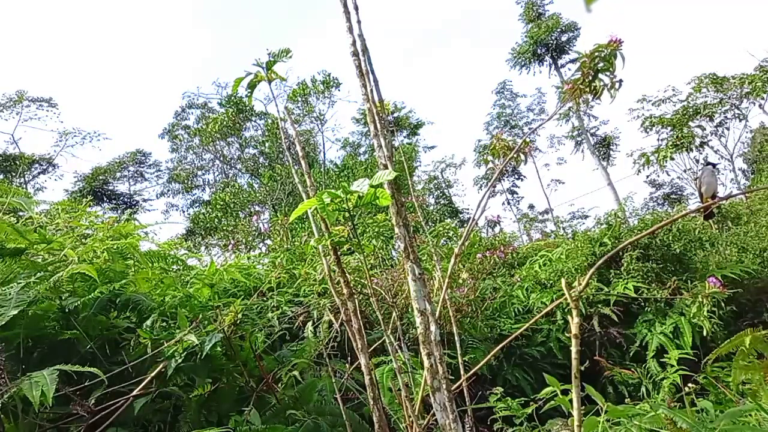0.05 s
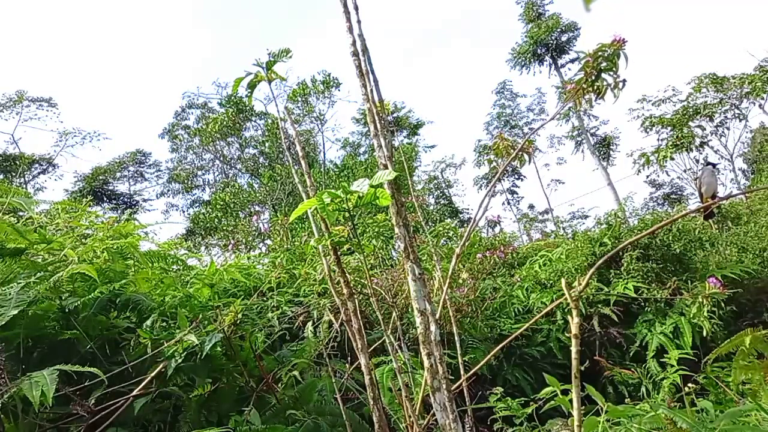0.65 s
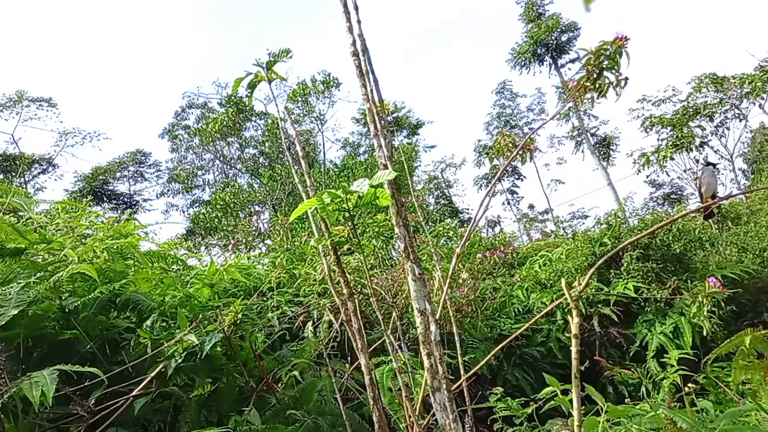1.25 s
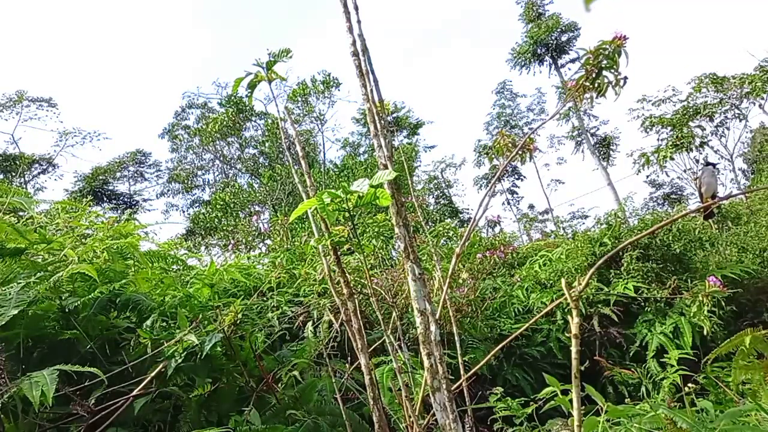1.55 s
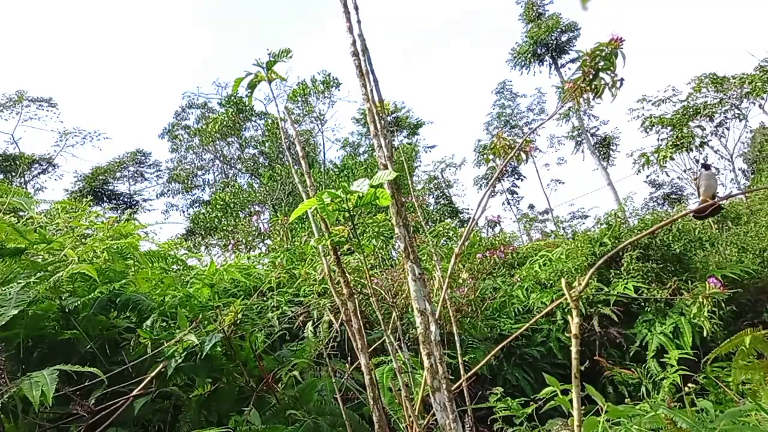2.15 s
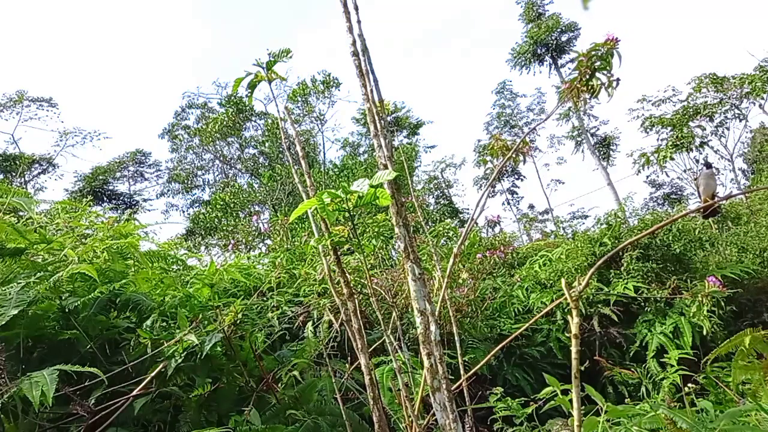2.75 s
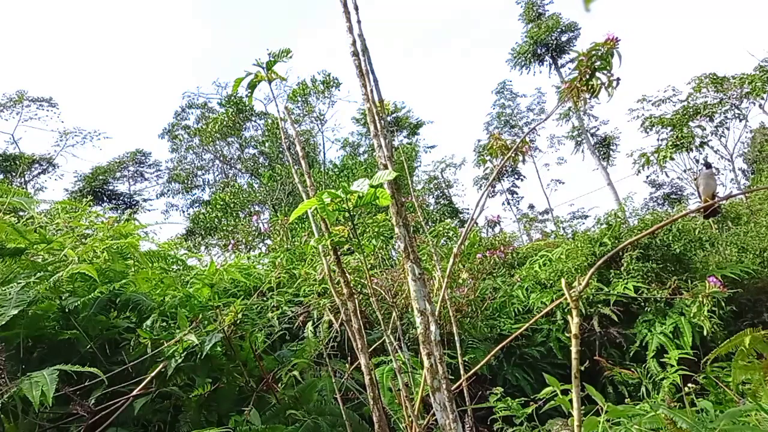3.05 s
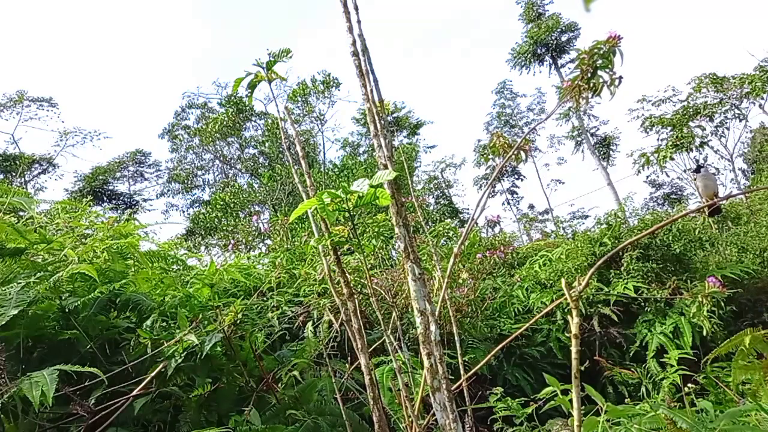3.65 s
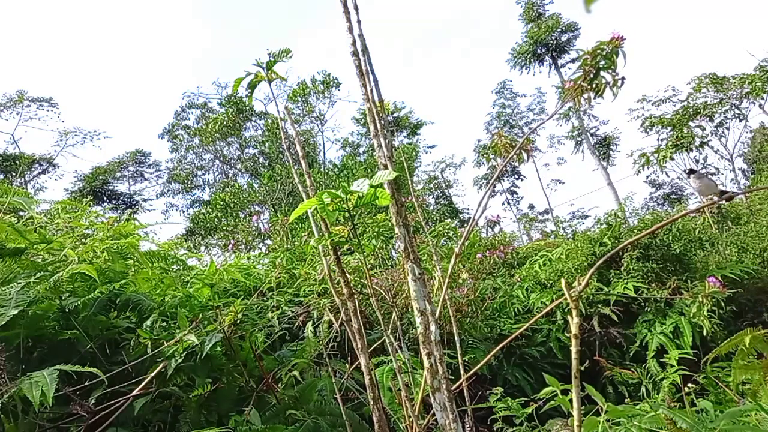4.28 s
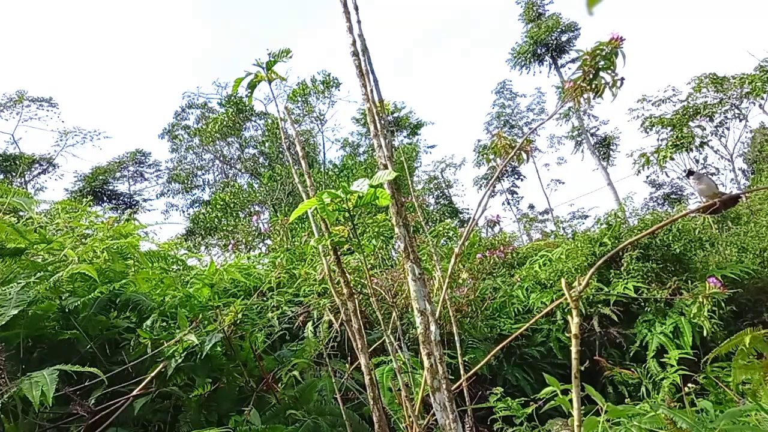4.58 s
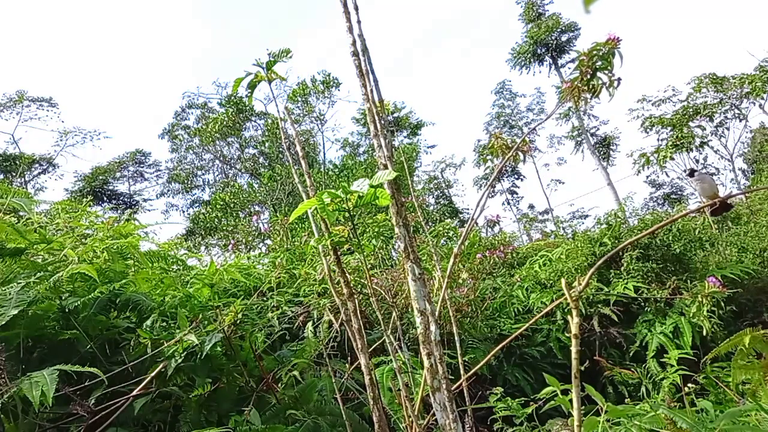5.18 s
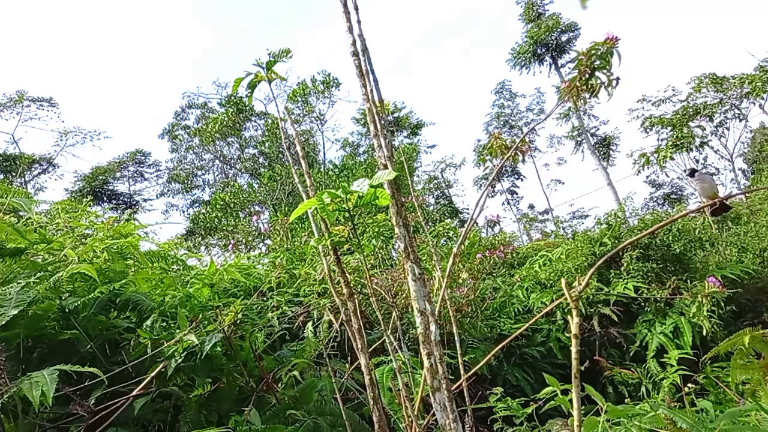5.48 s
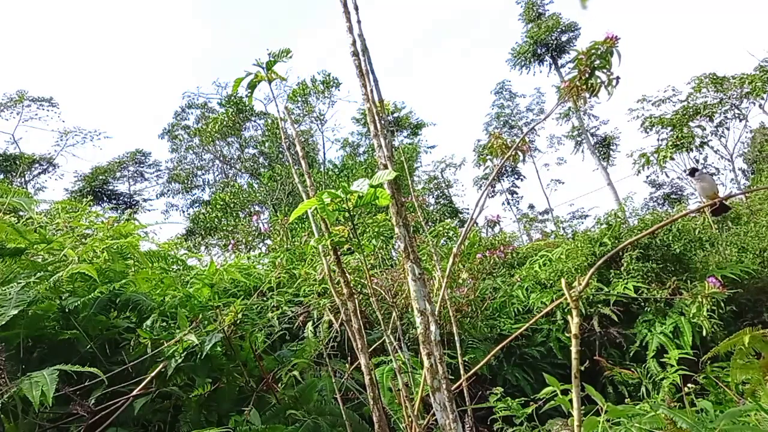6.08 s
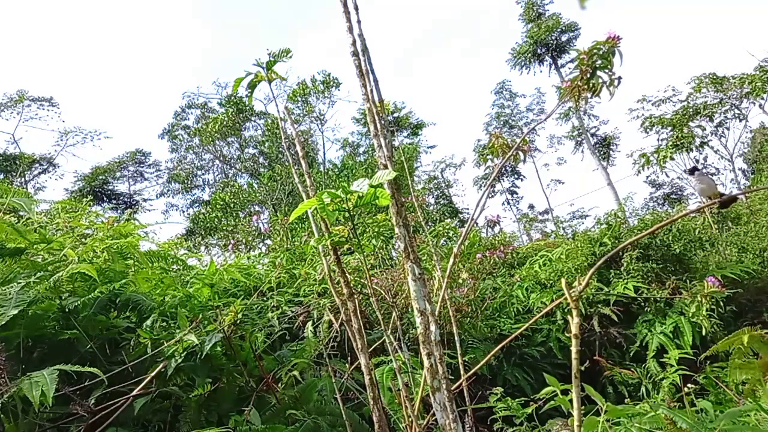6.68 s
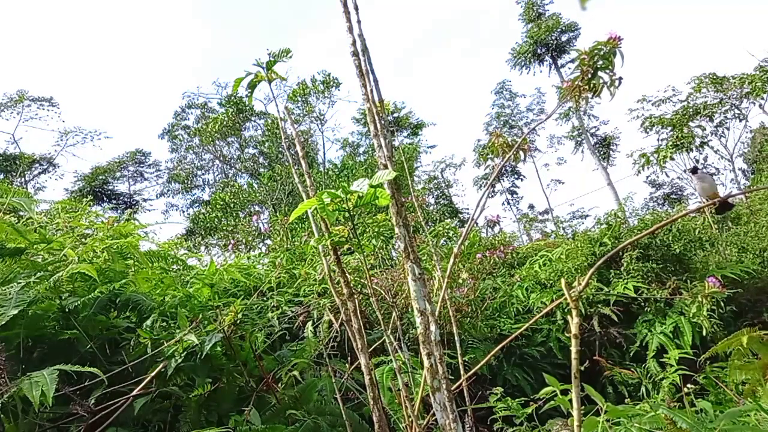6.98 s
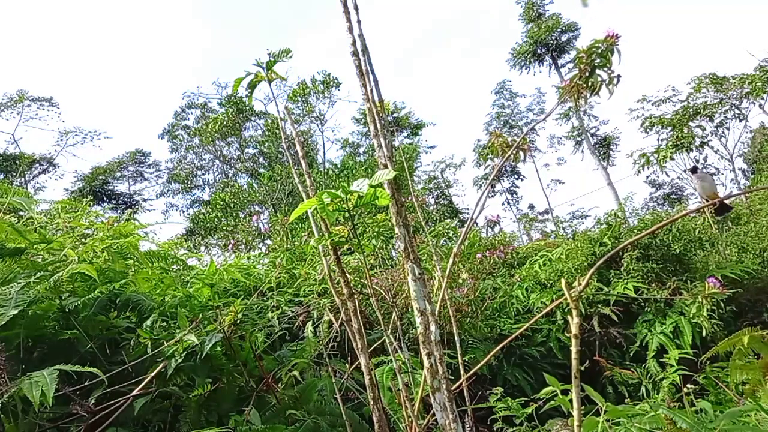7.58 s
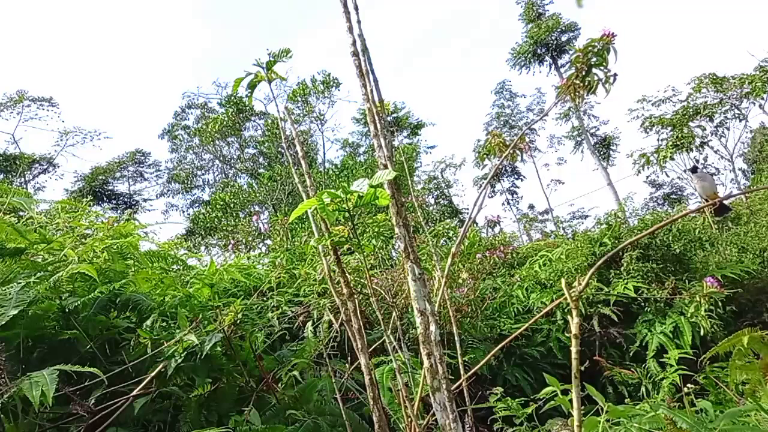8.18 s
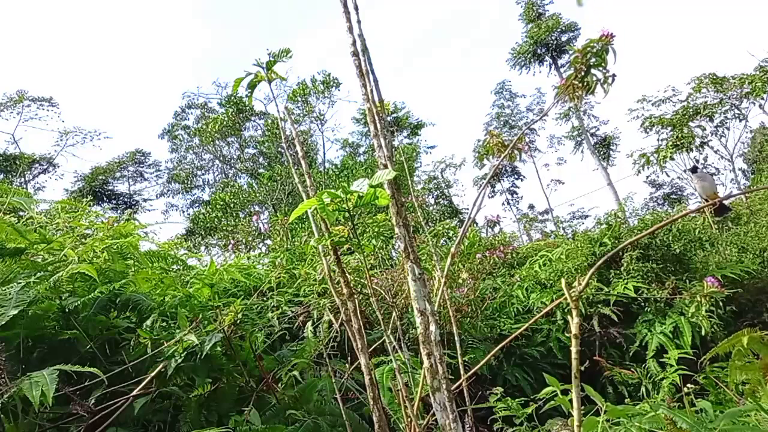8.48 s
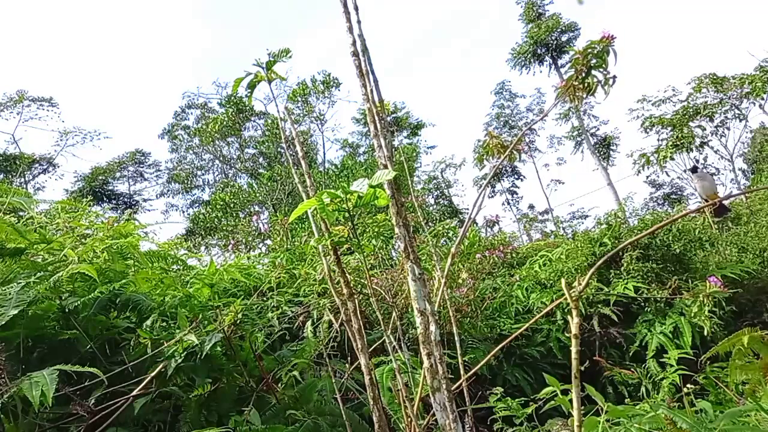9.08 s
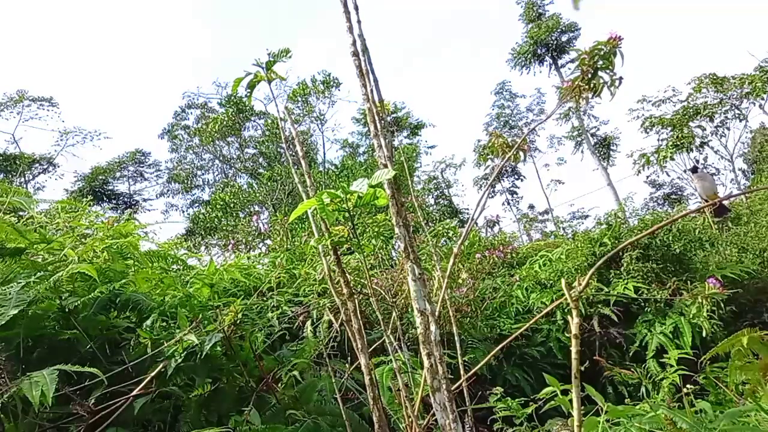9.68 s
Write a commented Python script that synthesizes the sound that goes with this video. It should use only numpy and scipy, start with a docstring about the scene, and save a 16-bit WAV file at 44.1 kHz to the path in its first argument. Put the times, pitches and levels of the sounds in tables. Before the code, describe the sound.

A quiet outdoor hillside runs for about ten seconds, with a faint low rumble, a thin hiss and several crickets chirping softly in high, pulsing bouts. At about 1.8 seconds a nearby bulbul gives a short, sharp call lasting roughly a third of a second: a rasping chip, a two-step note, then a loud whistled flourish. It repeats the call at 4.2 seconds, slightly duller, and again at 6.5 seconds. The loudest notes slightly overload the microphone, and the foliage adds a brief, light reverberation. Very faint peeps from distant birds are scattered throughout, the clearest near 7.5 seconds. A barely audible, high, throbbing bush cricket swells from about 1 to 4.5 seconds and again from 7.5 seconds. After the last call only the insects, far peeps and rumble remain.

```python
"""A green hillside. From the start the valley rumbles faintly and crickets chirp by stridulation.
Small birds begin to peep far off, and a bush cricket's throbbing wing resonance slowly swells.
Near 1.8, 4.2 and 6.5 s a nearby bulbul calls with both sides of its syrinx: a rasping chip, a two-step
note, then a loud whistled flourish. Leaves scatter the calls; the loudest notes overload the microphone.
Afterwards the bush cricket swells again, among the crickets and the last far peeps."""
import sys
import numpy as np
from scipy import signal
from scipy.fft import rfft, irfft, next_fast_len
from scipy.io import wavfile
from scipy.ndimage import uniform_filter1d, minimum_filter1d, map_coordinates

SR = 44100
rng = np.random.default_rng(int(sys.argv[2]) if len(sys.argv) > 2 else 0)


def inscribe(sig):
    """Save sig as 16-bit PCM at rate SR to the path in sys.argv[1].

    A 1-D sig is mono; a 2-D sig holds one channel per row.
    Samples are clipped to [-1, 1] before scaling.
    """
    pcm = np.round(np.clip(np.atleast_2d(sig).T, -1, 1) * 32767)
    wavfile.write(sys.argv[1], SR, pcm.astype(np.int16))


N = 433938

# spectra of the valley's rumble and thin hiss: (frequency [Hz], relative density [dB])
RUMBLE_SPECTRUM = [(12, -56.5), (20, -30), (54, -2), (103, 0.5), (200, -9.5), (236, -6), (278, -12.5),
                   (313, -12.5), (469, -19.5), (1030, -29), (3210, -36.5), (4060, -39), (4470, -37.5),
                   (5800, -45), (7540, -73), (12800, -120)]
VALLEY_HISS_SPECTRUM = [(4500, -31), (5800, -5), (6500, 1.5), (7400, 3), (8300, -4), (9500, -4.5),
                        (11500, -3.5), (13500, -3.5), (15500, -6)]
# reverberation among the trees: (frequency [Hz], time to decay by 60 dB [s])
HILLSIDE_T60 = [(500, .15), (2100, 0.16), (2900, 0.27), (3400, .36), (4300, 0.19), (8000, .17),
                (15000, .14)]

# near crickets, low to high: (chirp rate [1/s], start pitch [Hz], end pitch [Hz], mid-chirp bow [Hz])
CRICKET_VOICES = [(14.3, 6270, 6350, 80), (15.2, 6730, 6600, 85), (15.4, 6910, 6660, 155)]
CHIRP_S, CHIRP_ATTACK_S, CHIRP_RELEASE_S = .048, .016, .024
# runs of regular bouts: (first onset [s], last onset [s], approximate period [s], bout length [s])
LOW_CRICKET_RUNS = [(-.29, 3.91, .7, .52), (4.745, 6.135, .7, .49), (6.88, 9.2, .77, .55)]
MID_CRICKET_RUNS = [(.13, 2.96, .71, .36), (5.38, 9.18, .76, .39)]
FAR_TRILL_RUNS = [(-.17, 5.23, 1.35, .95), (6.38, 9.06, 1.34, .92)]
# the highest cricket's long, uneven bouts: (first chirp [s], last chirp [s])
HIGH_CRICKET_BOUTS = [(.045, .95), (1.27, 2.95), (3.145, 4.64), (4.83, 6.7), (6.96, 7.48), (7.6, 9.68)]
# peeps of far birds: (time [s], pitch [Hz], level [dB])
FAR_PEEPS = [(.75, 3250, -67), (1.48, 7420, -63), (2.93, 3240, -67.5), (3.78, 7450, -62), (4.94, 3200, -77),
             (7.52, 7300, -52.5), (7.69, 3100, -76), (9.61, 7300, -58)]
PEEP_S, PEEP_FALL_HZ = .075, 650
# the bush cricket's crescendos: (time [s], length [s], peak level [dB])
BUSH_CRICKET_SWELLS = [(1.0, 3.7, -70.5), (7.55, 3.2, -69)]

# notes of the bulbul's syllables, before each call scales them: (syrinx side [0 or 1], time [s],
# length [s], start pitch [Hz], end pitch [Hz], mid-note bow [Hz], level [dB], swell over the note [dB])
CHIP_NOTES = [(0, 0, .016, 3417, 4120, 0, -22, 15.5), (0, .008, .033, 3790, 4445, -180, -4.5, 1.5),
              (0, .034, .014, 4152, 4064, 0, 3, -0.5), (0, .043, .013, 4100, 3150, 100, -5.5, -6.5),
              (1, .001, .016, 2600, 2850, 0, -25, 11.5), (1, .011, .043, 2800, 1800, 329.5, -9.5, -1.5)]
STEP_NOTES = [(0, .001, .015, 1500, 2353, -250, -23, 18), (0, .009, .030, 2620, 2739, 90, -1, -1),
              (0, .033, .022, 2301, 2342, 0, 2.5, -2), (1, .003, .013, 2800, 4610, -280, -27, 8)]
FLOURISH_NOTES = [(0, 0.00086, .022, 2880, 2760, 70, -6.5, 14),
                  (0, .021, .040, 3413, 2739, -90, -0.6, -0.5), (0, .054, 0.026, 2820, 2155, 151, -8, 1),
                  (0, .077, .043, 2150, 2380, 580, 1, -1.5), (1, .012, .020, 2558, 2617, -350, -16, -3.5)]
# each syllable as sung: (time [s], gain [dB], stretch [ratio], pitch [ratio], treble gain [dB])
CHIP_CALLS = [(1.79, -15, .94, .98, 1), (4.193, -16.5, 1.0, 1.02, -6.5), (6.452, -14, 1.01, 1.005, -1)]
STEP_CALLS = [(1.890, -7.5, .97, 1.014, 0.5), (4.302, -13.5, 1.008, 0.99, -7.5), (6.553, -11, 1.02, .99, 0)]
FLOURISH_CALLS = [(1.9488, -1, 1, 0.99, 1), (4.361, -2.3, 1.014, 0.98, -10),
                  (6.616, -1.44, .98, 0.99, -2.5)]
# harmonic series of the voice: (multiple of the pitch [ratio], level [dB])
RASP_HARMONICS = [(1, -1.5), (2, -27), (3, -29), (4, -33.5)]
WHISTLE_HARMONICS = [(1, -2.5), (2, -45), (3, -45), (4, -42.5), (5, -44.5)]
# broadband hiss around the loud notes: (frequency [Hz], relative density [dB])
NOTE_HISS_SPECTRUM = [(300, -9.5), (1200, -12), (2300, 3), (4400, 3.5), (5800, -6.5), (7000, -0.5),
                      (8300, 1), (9600, -1.5), (11300, -2), (15000, -6)]
# the beak radiates harmonics unevenly: (frequency [Hz], gain [dB])
BEAK_RESPONSE = [(3500, 0), (5000, -2.5), (6000, -6.5), (7200, -5), (8500, 3.5), (9600, -2), (11200, 1.5),
                 (12400, -3.5), (14000, 0.5), (15800, -2.5)]
# the small throat passes little bass: (frequency [Hz], gain [dB])
THROAT_RESPONSE = [(500, -11.5), (1100, -5.5), (1600, -7), (2100, -2), (2500, 0)]
# the bushes reflect mostly treble: (frequency [Hz], gain [dB])
BUSH_REFLECTION = [(3300, -45), (4200, -24), (5500, -25), (8000, -18), (15000, -19)]
# the microphone's treble peaks: (frequency [Hz], gain [dB])
MICROPHONE_RESPONSE = [(5000, 0), (6300, 1.5), (7300, 0), (8300, 4.5), (9800, 0.5), (13000, 2.5),
                       (15500, 4)]
BAND_LIMIT_HZ = 15780


def amp(db):
    """Amplitude ratio of a level in decibels."""
    return 10 ** (np.asarray(db) / 20)


def unit(x):
    """Normalisation to rms 1."""
    return x / np.sqrt(np.mean(x ** 2) + 1e-20)


def along(points, hz):
    """Interpolation of (frequency [Hz], value) points on a log-frequency axis."""
    f, v = np.transpose(points)
    return np.interp(np.log(hz + 1), np.log(f + 1), v)


def wobble(rate, size):
    """Random modulation: a spline through `rate` knots a second."""
    knots = rng.standard_normal(int(size * rate / SR) + 4)
    return map_coordinates(knots, [np.arange(size) * rate / SR])


def filtered(x, response):
    """Linear filtering: the spectrum is multiplied by a frequency response."""
    m = next_fast_len(len(x) + 8192)
    return irfft(rfft(x, m) * response(np.fft.rfftfreq(m, 1 / SR)), m)[:len(x)]


def noise(spectrum, size):
    """Spectral shaping of white noise, at rms 1."""
    return unit(filtered(rng.standard_normal(size), lambda hz: amp(along(spectrum, hz))))


def add(track, s, sound):
    """Superposition of a sound on the track at time s."""
    start = round(s * SR)
    part = sound[max(-start, 0):max(len(track) - start, 0)]
    track[max(start, 0):][:len(part)] += part


def phase_of(hz):
    """Phase is the time integral of frequency."""
    return 2 * np.pi * np.cumsum(hz) / SR


def envelope(length_s, attack_s, release_s):
    """Amplitude envelope with raised-cosine attack and release."""
    t = np.arange(int(length_s * SR)) / SR
    ramp = lambda u: np.sin(np.pi / 2 * np.clip(u, 0, 1)) ** 2
    return ramp(t / attack_s) * ramp((length_s - t) / release_s)


def glide(from_hz, to_hz, bow_hz, size):
    """Parabolic frequency sweep, bow_hz off the straight line at its middle."""
    u = np.linspace(0, 1, size)
    return from_hz + (to_hz - from_hz) * u + bow_hz * (1 - (2 * u - 1) ** 2)


def bouts(runs):
    """Periodic repetition: (start [s], end [s]) of each bout of a regular singer."""
    return [(s, s + length) for first, last, period, length in runs
            for s in np.linspace(first, last, round((last - first) / period) + 1)]


def valley():
    """Broadband ambient noise: a rumble that drifts in level, under a thin, steady hiss."""
    rumble = amp(-54 + .6 * wobble(2.7, N)) * noise(RUMBLE_SPECTRUM, N)
    return rumble + amp(-74.5) * noise(VALLEY_HISS_SPECTRUM, N)


def cricket(spans, rate, from_hz, to_hz, bow_hz, db):
    """Stridulation: almost evenly spaced wing strokes, each a pure tone on a shallow arc of pitch."""
    track = np.zeros(N)
    gain = envelope(CHIRP_S, CHIRP_ATTACK_S, CHIRP_RELEASE_S)
    hz = glide(from_hz, to_hz, bow_hz, len(gain))
    for first, last in spans:
        for s in np.linspace(first, last, round((last - first) * rate) + 1):
            stroke = gain * np.sin(phase_of(hz * (1 + .002 * wobble(150, len(gain)))))
            onset = s - CHIRP_S / 2 + rng.normal(0, .002)
            add(track, onset, amp(db + rng.normal(0, 1.06)) * stroke)
    return track


def far_trill(strokes_per_s=22.5):
    """Rapid stridulation: a far cricket trills in swelling bouts, each stroke falling in pitch."""
    swell = np.zeros(N)
    for start, end in bouts(FAR_TRILL_RUNS):
        add(swell, start, envelope(end - start, attack_s=.3, release_s=.06))
    stroke_fraction = strokes_per_s * np.arange(N) / SR % 1
    hz = 4500 - 330 * (stroke_fraction - .5) + 90 * wobble(700, N)
    return amp(-74.5) * swell * np.sin(np.pi * stroke_fraction) ** 2 * np.sin(phase_of(hz))


def hillside(x, build_s):
    """Reverberation: the trees return a tail that builds up, then lingers longest near 3.4 kHz."""
    hz, t, spectra = signal.stft(rng.standard_normal(SR // 2), SR, nperseg=256)
    decay = amp(-60 * t / along(HILLSIDE_T60, hz)[:, None])
    build_up = (1 - np.exp(-t / build_s)) ** 2
    tail = signal.istft(spectra * decay * build_up, SR, nperseg=256)[1]
    return signal.fftconvolve(x, tail / np.linalg.norm(tail))[:N]


def wing_resonance(centre_hz, width_hz):
    """Resonance confines noise to one band, at rms 1."""
    response = lambda hz: 1 / (1 + (2 * (hz - centre_hz) / width_hz) ** 4)
    return unit(filtered(rng.standard_normal(N), response))


def crickets():
    """Superposition: three near crickets and a far trill reverberate; a distant chorus merges to noise."""
    low, mid, high = CRICKET_VOICES
    singers = cricket(bouts(LOW_CRICKET_RUNS), *low, db=-61.5)
    singers += cricket(bouts(MID_CRICKET_RUNS), *mid, db=-59)
    singers += cricket(HIGH_CRICKET_BOUTS, *high, db=-59.5)
    singers += far_trill()
    chorus = amp(-71.5) * wing_resonance(centre_hz=6650, width_hz=730)
    return singers + amp(-8) * hillside(singers, build_s=.005) + chorus


def far_birds():
    """Random frequency modulation makes falling peeps husky; reverberation blurs them."""
    track = np.zeros(N)
    gain = envelope(PEEP_S, attack_s=.03, release_s=.031)
    fall = PEEP_FALL_HZ * (.42 - np.linspace(0, 1, len(gain)))
    for s, hz, db in FAR_PEEPS:
        jitter_hz = 110 * wobble(916, len(gain))
        add(track, s, amp(db) * gain * np.sin(phase_of(hz + fall + jitter_hz)))
    return track + amp(-5.5) * hillside(track, build_s=.011)


def bush_cricket(throb_hz=6.35):
    """Amplitude modulation of a wing resonance: a throb that builds slowly and stops quickly."""
    swell = np.zeros(N)
    for s, length, db in BUSH_CRICKET_SWELLS:
        add(swell, s, amp(db) * envelope(length, attack_s=1.9, release_s=.5))
    t = np.arange(N) / SR
    throb = amp(4.5 * (np.cos(2 * np.pi * throb_hz * (t - 9.02)) - 1))
    return swell * throb * wing_resonance(centre_hz=8200, width_hz=640)


def syllable(notes, stretch, pitch, treble_db, harmonics, attack_s, release_s, jitter, hiss_db,
             flutter=0):
    """Two-voice phonation: each side of the syrinx slurs its notes; membrane flutter makes a rasp."""
    size = SR // 7
    t = np.arange(size) / SR
    power, weighted_hz = np.zeros((2, 2, size))
    for side, start, length, from_hz, to_hz, bow_hz, level_db, swell_db in notes:
        shape = envelope(length * stretch, attack_s, release_s)
        note_power = (shape * amp(level_db + swell_db * np.linspace(-.5, .5, len(shape)))) ** 2
        add(power[side], start * stretch, note_power)
        add(weighted_hz[side], start * stretch, note_power * glide(from_hz, to_hz, bow_hz, len(shape)))
    # where two notes overlap, the stronger one pulls the pitch
    side_hz = pitch * weighted_hz / (power + 1e-20)
    flutter_depth = flutter * np.exp(-((t - .023) / .013) ** 4)  # greatest in mid-syllable
    voice = np.zeros(size)
    for gain, hz in zip(np.sqrt(power), side_hz):
        shake = np.sin(2 * np.pi * 180 * t) + .89 * wobble(1800, size)
        phase = phase_of(hz * (1 + jitter * wobble(700, size) + flutter_depth * shake))
        tone = sum(amp(db + along(BEAK_RESPONSE, k * hz)) * np.sin(k * phase) for k, db in harmonics)
        # the hiss grows faster than the tone as a note gets louder
        hiss = amp(hiss_db) * np.sqrt(gain) * noise(NOTE_HISS_SPECTRUM, size)
        voice += gain * (tone + hiss)
    # directivity: treble beams forward, so it fades when the head turns away
    return filtered(voice, lambda f: amp(along([(5000, 0), (11000, treble_db)], f)))


def leaves(x, leaf_db, t60_s):
    """Scattering: foliage close by adds a cloud of faint early reflections."""
    t = np.arange(SR // 10) / SR
    cloud = rng.standard_normal(len(t)) * amp(-60 * t / t60_s) * (t > .002)
    reflections = signal.fftconvolve(x, cloud / np.linalg.norm(cloud))
    return np.pad(x, (0, len(t) - 1)) + amp(leaf_db) * reflections


def bulbul():
    """Source and filter: chip, two-step note and flourish, shaped by the throat and the foliage."""
    song = np.zeros(N)
    for s, db, *manner in CHIP_CALLS:
        chip = syllable(CHIP_NOTES, *manner, RASP_HARMONICS,
                        attack_s=.009, release_s=.0053, jitter=.012, hiss_db=-19, flutter=.11)
        add(song, s, amp(db) * leaves(chip, leaf_db=-7, t60_s=.075))
    for s, db, *manner in STEP_CALLS:
        step = syllable(STEP_NOTES, *manner, WHISTLE_HARMONICS,
                        attack_s=.0075, release_s=.0059, jitter=.005, hiss_db=-44)
        add(song, s, amp(db) * leaves(step, leaf_db=-11.5, t60_s=.06))
    for s, db, *manner in FLOURISH_CALLS:
        flourish = syllable(FLOURISH_NOTES, *manner, WHISTLE_HARMONICS,
                            attack_s=.0046, release_s=.007, jitter=.015, hiss_db=-39.5)
        add(song, s, amp(db) * leaves(flourish, leaf_db=-9.5, t60_s=.065))
    song = filtered(song, lambda hz: amp(along(THROAT_RESPONSE, hz)))
    reflected = filtered(song, lambda hz: amp(along(BUSH_REFLECTION, hz)))
    return song + hillside(reflected, build_s=.004) + amp(-37.5) * hillside(song, build_s=.061)


def scene():
    """Superposition of all sources at one spot on the slope."""
    return (valley() + crickets() + far_birds() + bush_cricket() + bulbul())[None]


def record(dry, ceiling=.69, knee=12):
    """Overload: a fast limiter and soft clip hold the peaks; the microphone adds treble and a band limit."""
    needed_gain = np.minimum(1, .98 / (np.abs(dry[0]) + 1e-9))
    limited = dry[0] * uniform_filter1d(minimum_filter1d(needed_gain, size=90), size=90)
    clipped = limited / (1 + np.abs(limited / ceiling) ** knee) ** (1 / knee)
    return filtered(clipped, lambda hz: amp(along(MICROPHONE_RESPONSE, hz)) * (hz < BAND_LIMIT_HZ))[None]


dry = scene()
out = record(dry)
inscribe(out)
```